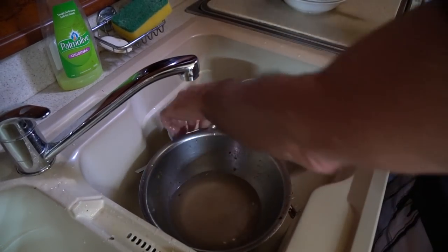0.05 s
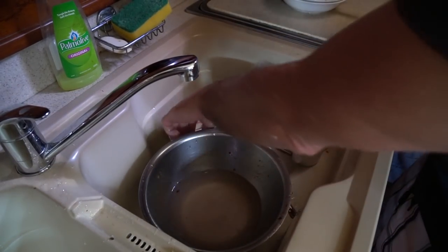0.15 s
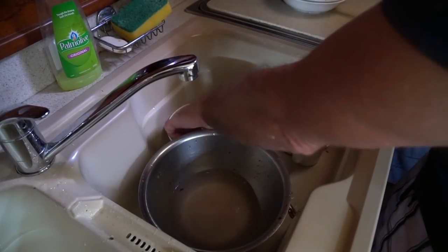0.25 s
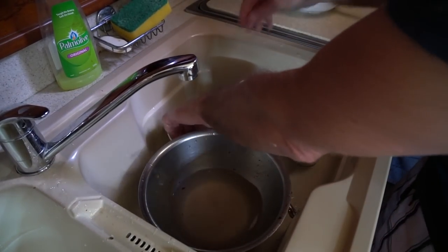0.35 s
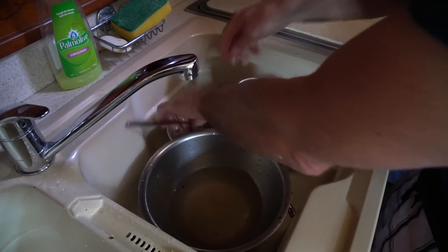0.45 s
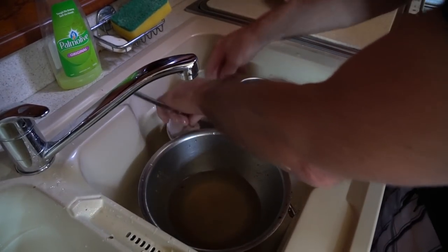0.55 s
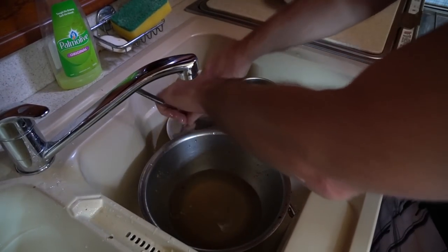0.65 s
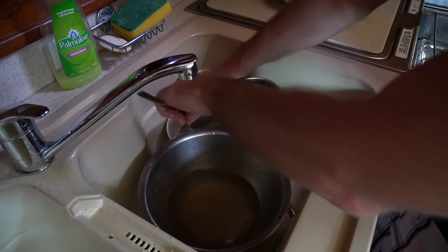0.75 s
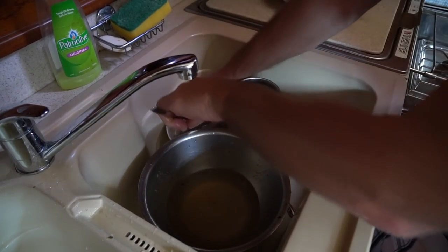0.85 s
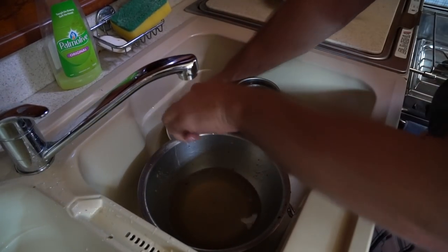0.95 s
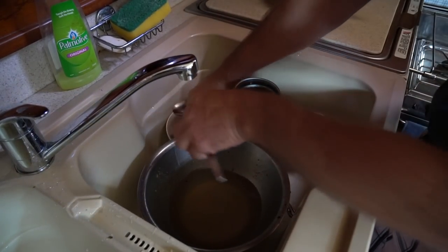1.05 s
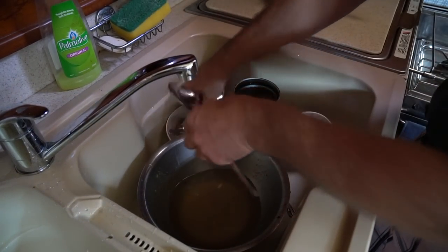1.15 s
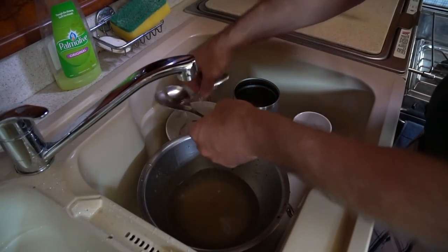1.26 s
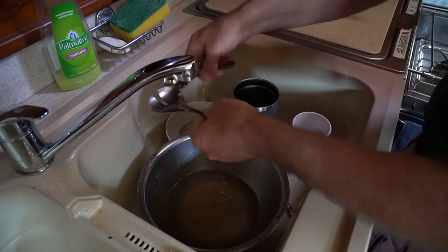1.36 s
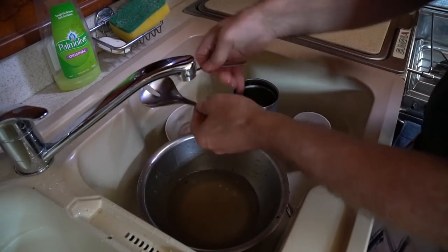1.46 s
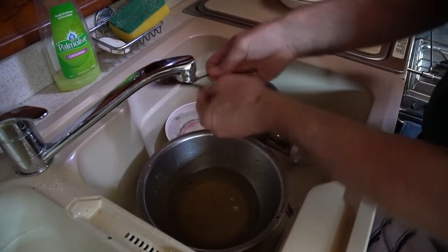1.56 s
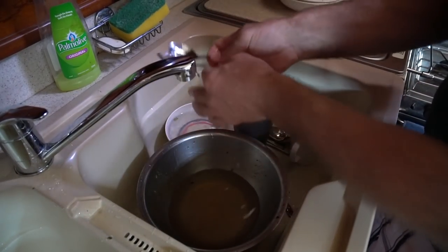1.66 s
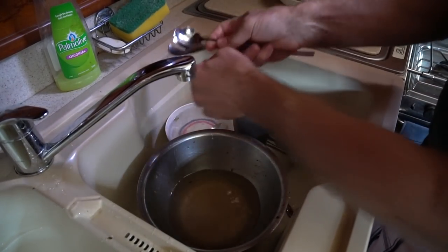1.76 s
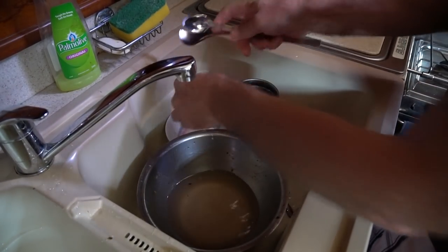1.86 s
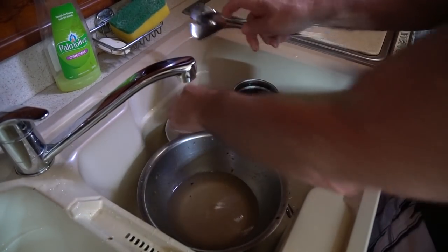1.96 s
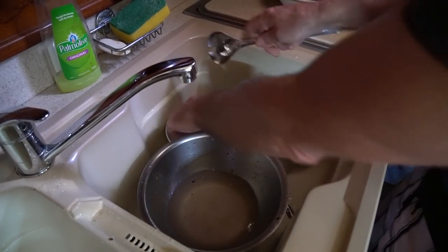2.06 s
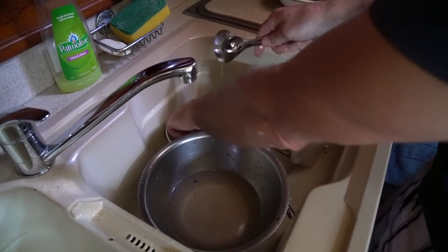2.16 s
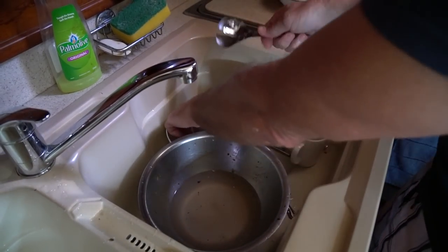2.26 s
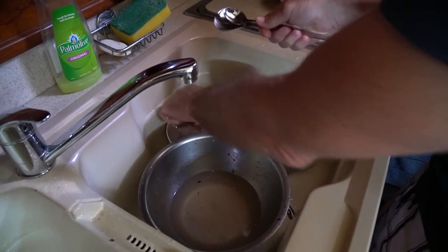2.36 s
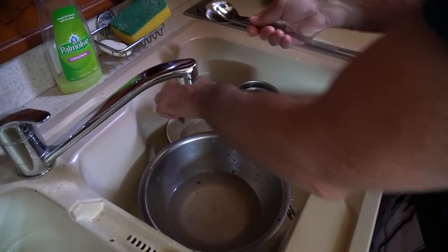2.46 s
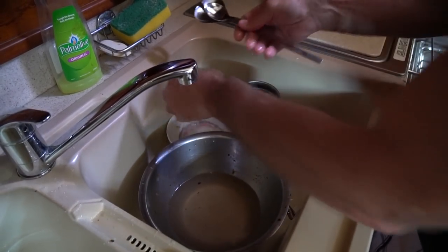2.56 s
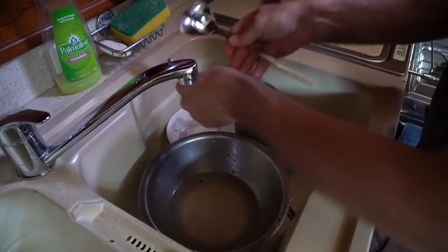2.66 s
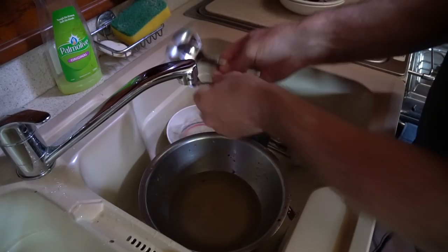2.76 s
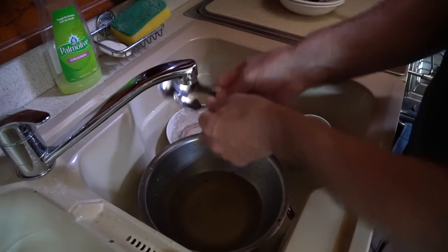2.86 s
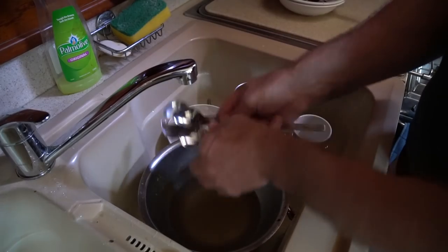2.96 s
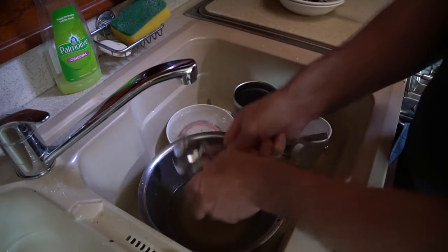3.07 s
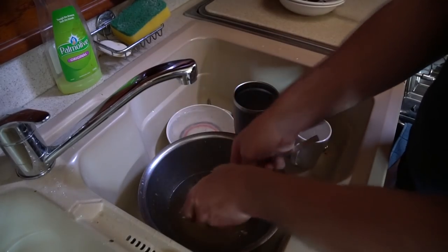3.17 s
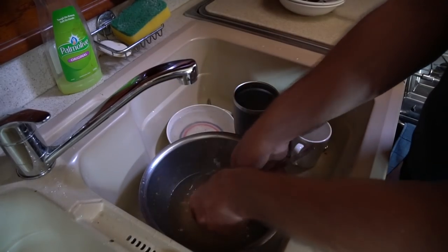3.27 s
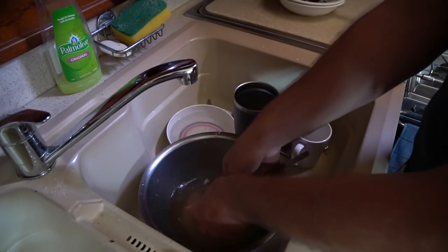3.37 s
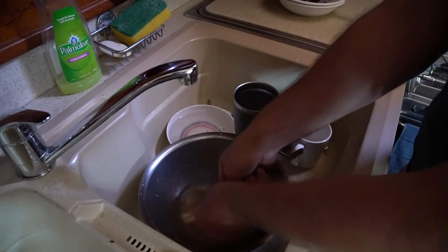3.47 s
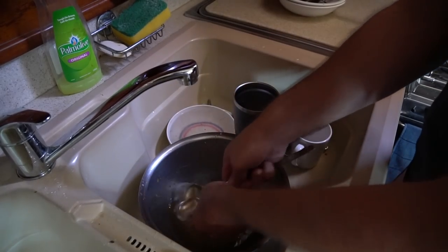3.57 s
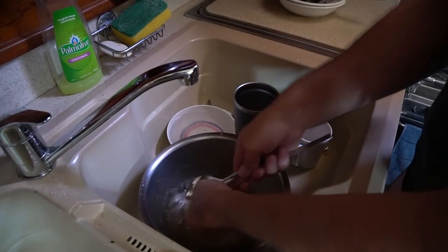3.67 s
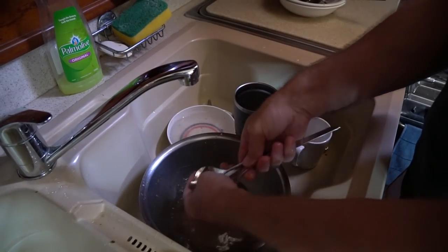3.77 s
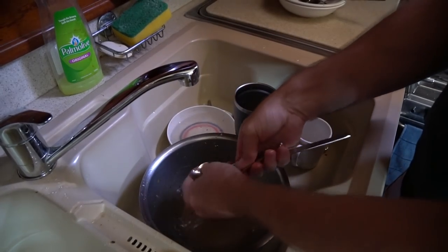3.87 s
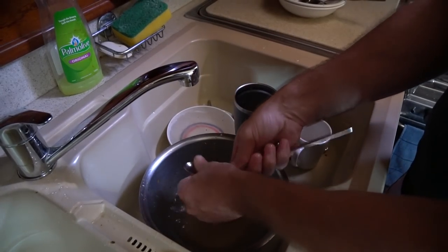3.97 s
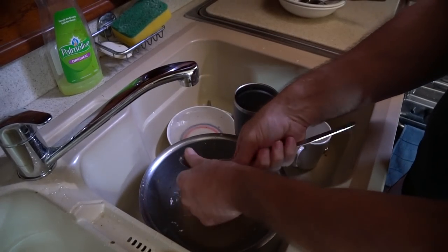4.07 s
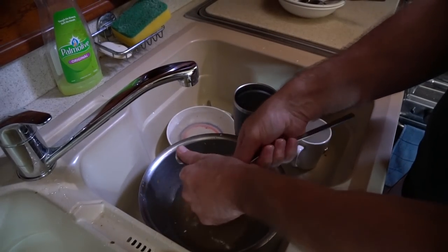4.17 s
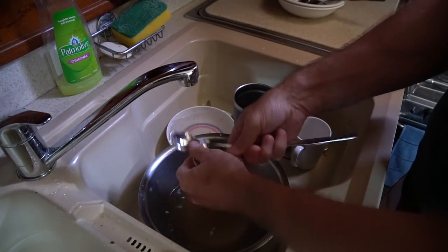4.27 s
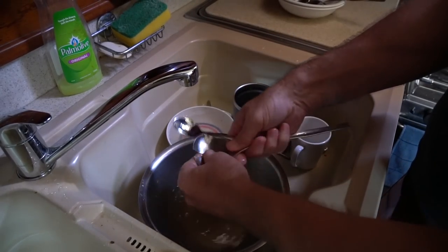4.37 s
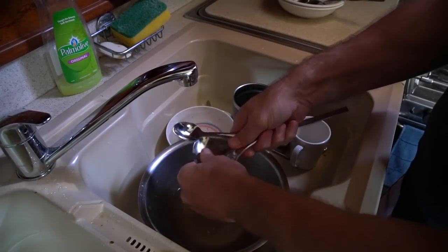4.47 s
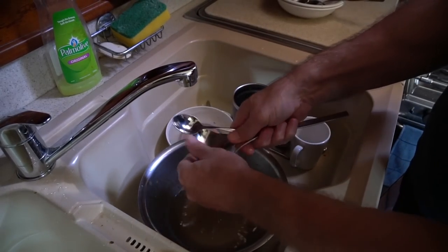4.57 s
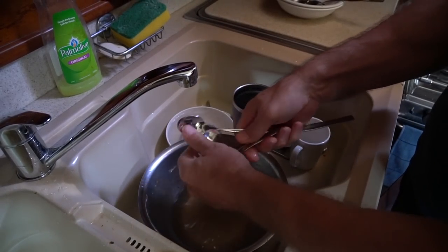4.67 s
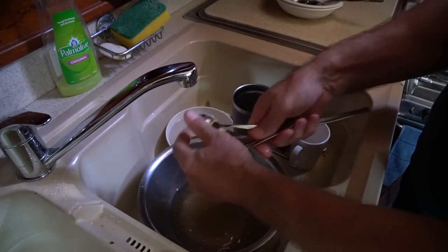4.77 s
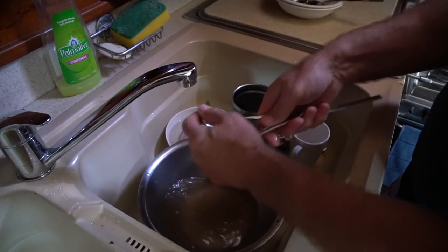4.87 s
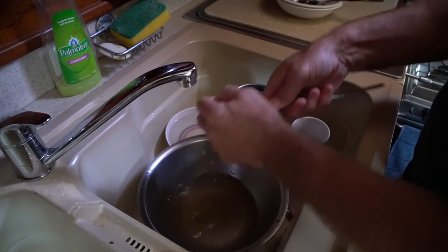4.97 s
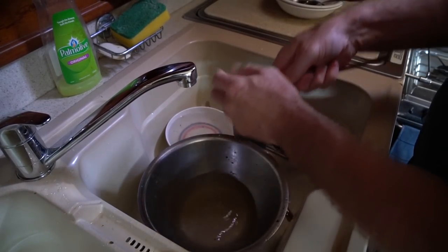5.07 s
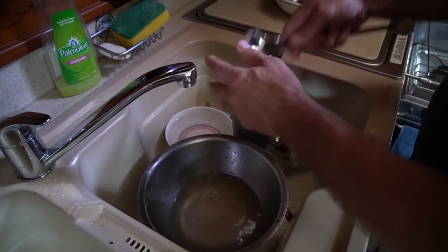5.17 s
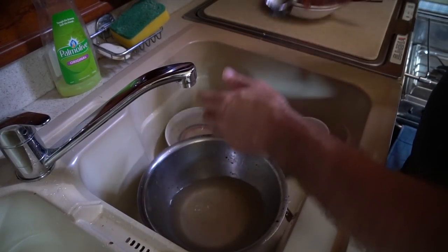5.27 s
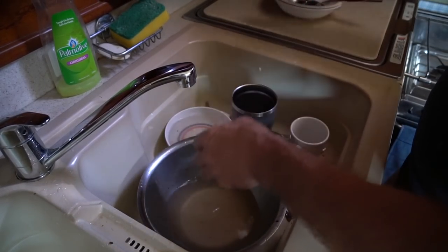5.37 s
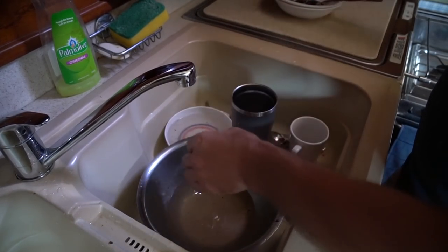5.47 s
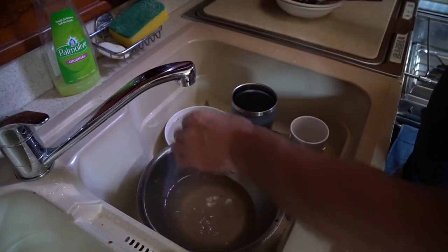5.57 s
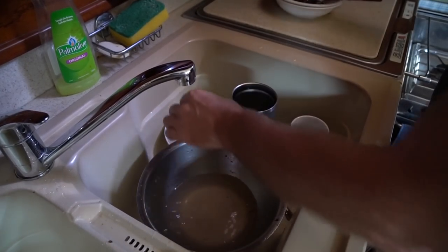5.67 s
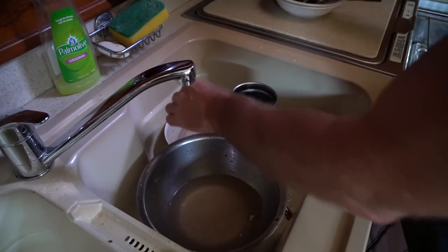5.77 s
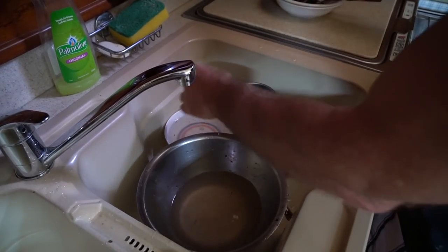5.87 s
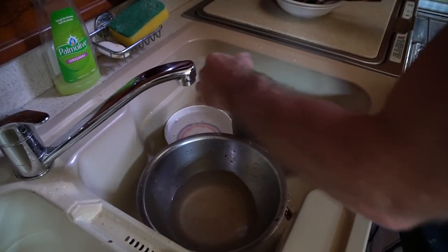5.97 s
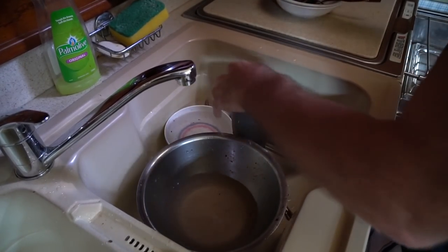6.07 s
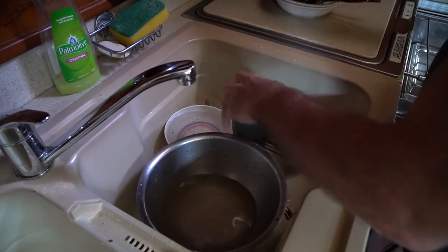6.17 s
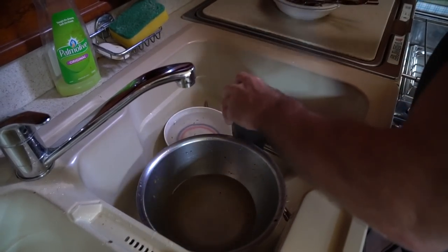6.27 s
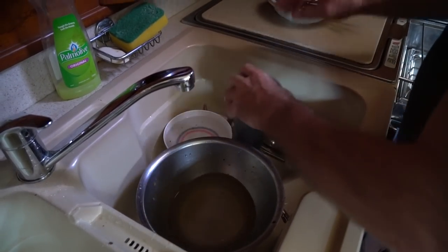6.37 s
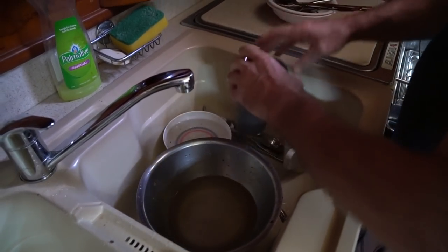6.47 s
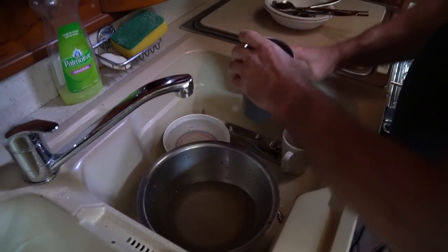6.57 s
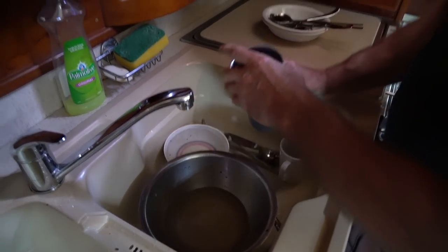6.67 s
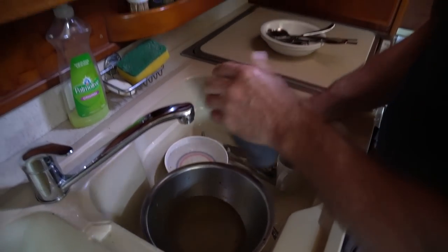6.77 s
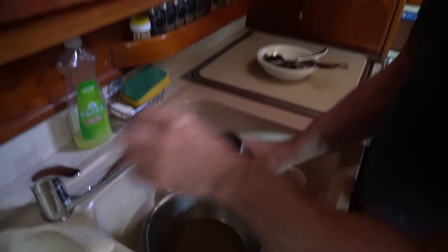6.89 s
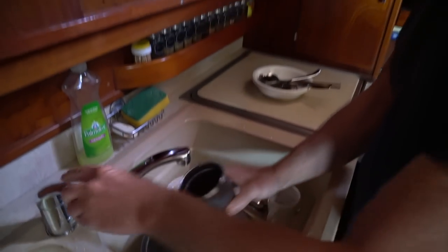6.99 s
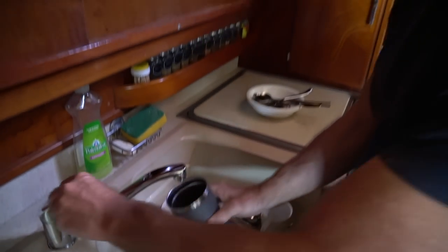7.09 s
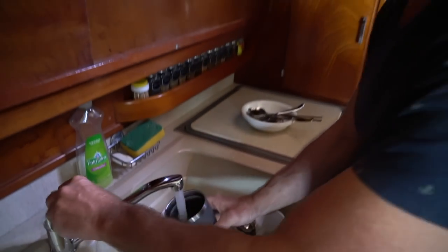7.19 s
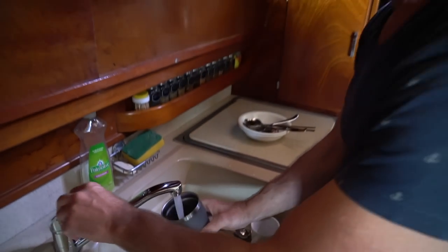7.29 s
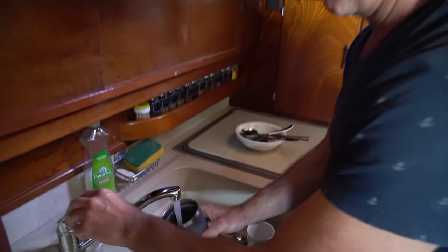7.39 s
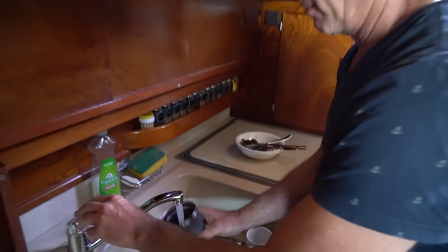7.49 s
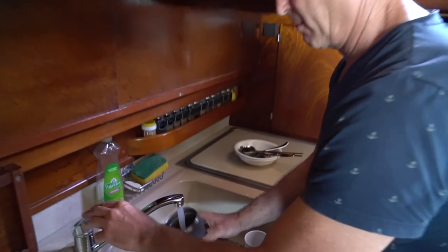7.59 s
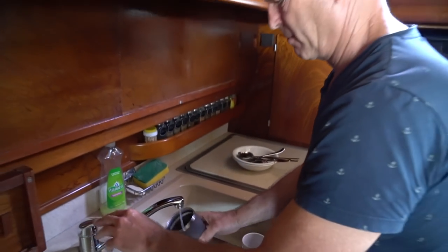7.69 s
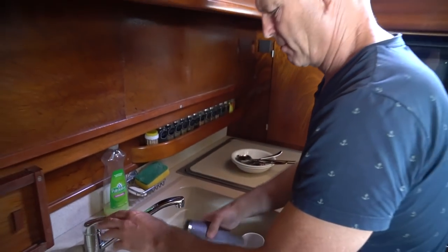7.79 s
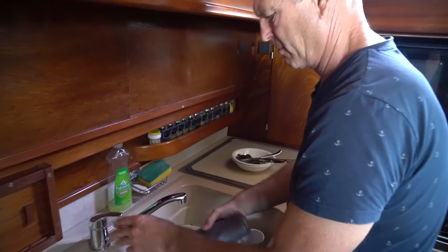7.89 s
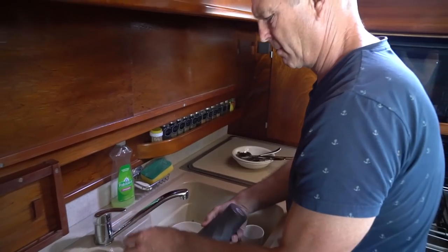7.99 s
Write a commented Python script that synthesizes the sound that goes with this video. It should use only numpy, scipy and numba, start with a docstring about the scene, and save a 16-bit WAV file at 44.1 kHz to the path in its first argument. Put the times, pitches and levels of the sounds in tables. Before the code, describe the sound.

Bowls and a steel pot clatter in a sink, cutlery chinks and splashes, a mug rings briefly, then a tap runs into it.

```python
"""Hand washing-up in a small wooden galley, heard from close by, over the cabin's faint rumble, hiss and wavering hum.
First bowls and a steel pot knock and grind in the sink; then a fistful of cutlery chinks, is dunked with a splash
and is dropped in a bowl. A mug rings until a hand closes round it, then the tap runs and its pump hums.
Every contact is a burst of tiny collisions that rings the things struck; water is shaped noise and clouds of
chirping bubbles. The cabin adds a short diffuse tail."""
import sys
import numpy as np
from scipy import signal
from scipy.fft import rfft, irfft
from scipy.io import wavfile
from scipy.ndimage import uniform_filter1d
from numba import njit

SR = 44100
rng = np.random.default_rng(int(sys.argv[2]) if len(sys.argv) > 2 else 0)


def invert_db(x):
    """Field ratio 10**(x/20) for x, a level in decibels (scalar or array-like)."""
    u = np.asarray(x, float) / 20
    return 10 ** u


def int16_out(signal):
    """Quantize to a 16-bit WAV file."""
    q = np.round(np.clip(np.atleast_2d(signal).T, -1, 1) * 32767)
    wavfile.write(sys.argv[1], SR, q.astype(np.int16))


N = 354194
TIME = np.arange(N) / SR
SIDES = np.array([[1], [-1]])  # left, right
CUTLERY_FROM_S, MUG_FROM_S = 1.5555, 6.2896  # first blow of each

# limits of the bass, middle and treble bands of a contact: (frequency [Hz])
CONTACT_EDGES_HZ = (270, 1600, 5500, 11500)


def unit(x):
    """Scale to rms 1."""
    return x / np.sqrt(np.mean(x ** 2))


def band(x, lo_hz, hi_hz, order=2):
    """Band-pass."""
    return signal.sosfilt(signal.butter(order, [lo_hz, hi_hz], "bandpass", fs=SR, output="sos"), x)


def coloured(points, shape):
    """Noise of rms 1 whose spectrum follows (Hz, dB) points."""
    hz, db = np.transpose(points)
    noise_hz = np.fft.rfftfreq(N, 1 / SR) + 1
    gain = invert_db(np.interp(np.log(noise_hz), np.log(hz), db))
    return unit(irfft(rfft(rng.standard_normal(shape)) * gain, N))


def walk(rate):
    """Random levels held 1 / rate s and slewed; spread near 1."""
    k = int(SR / rate)
    levels = np.repeat(rng.standard_normal(N // k + 1), k)
    return unit(uniform_filter1d(levels, k))[:N]


def swells(rows):
    """Sum of envelopes that rise, hold and die away, straight in dB; rise and t60 are times over 60 dB."""
    total = 0
    for full_s, hold, db, rise, t60 in rows:
        before = np.clip(full_s - TIME, 0, None)
        after = np.clip(TIME - full_s - hold, 0, None)
        total = total + invert_db(db - 60 * before / rise - 60 * after / t60)
    return total


def tones(rows, glide, rise_ms):
    """Damped tones whose pitch moves steadily from the given one, by a share of 2 * glide over the t60."""
    out = np.zeros(N)
    for start, db, hz, t60_ms in rows:
        i, t60 = int(start * SR), t60_ms / 1000
        t = TIME[:min(int(t60 * SR), N - i)]
        level = invert_db(db - 60 * t / t60) * (1 - np.exp(-1000 * t / rise_ms))
        out[i:i + len(t)] += level * np.sin(2 * np.pi * hz * t * (1 + glide * t / t60))
    return out


def bubbles(during, low_hz, span, cycles, count):
    """A cloud of small bubbles between two times, each ringing a few cycles and rising in pitch; rms 1 there."""
    start, end = during
    when, pitch, size = rng.random((count, 3)).T
    hz = low_hz * span ** pitch
    rows = np.transpose([start + when * (end - start), 12 * size, hz, 1000 * cycles / hz])
    return unit(tones(rows, glide=0.108, rise_ms=0.091)) * np.sqrt((end - start) * SR / N)


def colour(middle_db, slope, offset_db):
    """Gains of bass, middle and treble, treble at 0 dB: bass dB = slope * middle dB + offset dB."""
    return invert_db(np.array([slope * middle_db + offset_db, middle_db, 0 * middle_db]))


def grit(scatter_db):
    """Dense tiny collisions of uneven size, heard as bass, middle and treble."""
    sizes = np.minimum(rng.exponential(size=N // 16 + 1), 4.5)
    size = invert_db(scatter_db * np.repeat(sizes, 16)[:N])
    limits = zip(CONTACT_EDGES_HZ, CONTACT_EDGES_HZ[1:])
    return np.array([unit(band(size * rng.standard_normal(N), lo, hi, order=3)) for lo, hi in limits])


@njit
def ring(push, latest, gains, poles):
    """Each mode is pushed with the share and pitch that the latest blow gives it, and decays freely."""
    out = np.zeros(len(push))
    for m in range(poles.shape[1]):
        z = 0j
        for i in range(len(push)):
            z = z * poles[latest[i], m] + gains[latest[i], m] * push[i] + 1e-18
            out[i] += z.imag
    return out


def struck(blows, bass, modes, rub, ring_db, focus_db, rise_ms, kick_db, crack_db=5.5, scatter_db=3.5,
           pieces=False, chatter_db=-.5, slide_db=-27.5, dull_db=1.5, dull_t60=.012, damping=1):
    """Blows and rubbing shake an object: returns its raw chatter and its modes, loudest near the favoured ring."""
    # part of the t60 that bass, middle and treble chatter for: (share [1])
    fade_share = np.array((1.242, 0.961, 0.743))[:, None]
    slide_t60 = 0.363  # s; every blow leaves things sliding a while
    s, db, middle_db, favoured_hz, t60, *second_hz = np.transpose(blows)
    effort, impact = rub.copy(), np.zeros((3, N))
    for start, gains, fade in zip(s, (invert_db(db) * colour(middle_db, *bass)).T, t60):
        i = int(start * SR)
        t = TIME[:min(int(slide_t60 * SR), N - i)]
        decay = invert_db(-60 * t / fade / fade_share) + invert_db(slide_db - 60 * t / slide_t60)
        effort[:, i:i + len(t)] += gains[:, None] * decay * (1 - np.exp(-1000 * t / rise_ms)) / 2
        impact[:, i] = gains
    chatter = np.sum(effort * grit(2.15), axis=0)

    # the first contact is one sharp impulse: it cracks, and it kicks every mode at once
    limits = zip(impact, CONTACT_EDGES_HZ, CONTACT_EDGES_HZ[1:])
    kick = sum(band(one, lo, hi) for one, lo, hi in limits)

    # loose pieces differ a little in size: all modes shift until the nearest one sits on the favoured ring
    hz, mode_db, mode_t60 = np.transpose(modes)
    favoured = favoured_hz[:, None]
    nearest = hz[np.argmin(np.abs(np.log(hz / favoured)), axis=1)]
    hz = hz * (favoured_hz / nearest)[:, None] ** pieces
    octaves = np.abs(np.log2(hz / favoured))
    focus = focus_db * np.exp(-(octaves / 0.061) ** 2)
    shares = invert_db(ring_db + mode_db + focus + scatter_db * rng.standard_normal(octaves.shape))

    # the spot that is hit adds its own broad, quickly damped rings
    dull_hz = np.transpose([favoured_hz, *second_hz])
    hz = np.hstack([hz, dull_hz])
    shares = np.hstack([shares, invert_db(dull_db + 0 * dull_hz)])
    damping = np.reshape(damping, (-1, 1))
    all_t60 = np.append(mode_t60, dull_t60 + 0 * dull_hz[0]) * damping
    loss = np.log(1000) / (all_t60 * SR)
    latest = np.clip(np.searchsorted(s, TIME + 1 / SR) - 1, 0, None)
    # the loss in the gain keeps the peak height of a mode independent of its t60
    gains = 2 * loss * shares * damping ** .5
    rings = ring(chatter + invert_db(kick_db) * kick, latest, gains, np.exp(2j * np.pi * hz / SR - loss))
    return invert_db(chatter_db) * chatter + invert_db(crack_db) * kick, rings


def cabin():
    """Faint rumble and hiss, the bass alike on both sides, and a low narrow-band hum that wavers."""
    # spectrum of the rumble and hiss: (frequency [Hz], relative level [dB])
    rumble_and_hiss = [(15, -29), (40, -3.5), (64, -6), (138, -12.5), (240, -14.5), (401, -33), (740, -33),
                       (819, -35), (11000, -48.5), (14300, -84), (22000, -120)]
    # level of the hum: (time [s], level [dB])
    hum_levels = [(0.0, -61.5), (0.09, -62.5), (5.59, -59.5), (5.86, -48.5), (6.78, -68), (7.42, -62.5),
                  (7.6, -46), (8.03, -64.5)]
    mid, side = coloured(rumble_and_hiss, (2, N))
    side = band(side, 300, 11000, order=1)
    s, db = np.transpose(hum_levels)
    hum = unit(band(rng.standard_normal(N), 91, 103)) * invert_db(np.interp(TIME, s, db))
    return invert_db(-64 + 2.0 * walk(1)) * (mid + .8 * side * SIDES) + hum


def scrapes():
    """Rubbing of whatever is in hand: unsteady bass, middle and treble effort; duller rubbing has more bass."""
    # scrapes: (full by [s], hold [s], treble level [dB], middle re treble [dB])
    scrape_rows = [(0.151, 0.218, -50, 10.5), (0.469, 0.1487, -39.5, 3), (0.965, 0.483, -60, 6),
                   (1.6, 0.742, -67.5, 2.5), (2.75, 0.039, -67.5, 6), (3.19, 0.026, -51.5, -4.5),
                   (3.801, 0.055, -59, -9.5), (4.867, 0.054, -42.5, -11.5), (5.201, 0.47, -71.5, -3),
                   (5.398, .004, -42, -10), (5.55, .02, -51, -12), (5.6, 0.1523, -30.5, -5.5),
                   (5.9, 0.1416, -32, -16), (6.255, 0.028, -67.5, -0.5), (6.419, 0.286, -77, 5.5)]
    rise, t60 = .15, 0.23  # s over 60 dB
    rub = np.zeros((3, N))
    for full_s, hold, db, middle_db in scrape_rows:
        rub = rub + colour(middle_db, 0.87, -9)[:, None] * swells([(full_s, hold, db, rise, t60)])
    return rub * invert_db(2.5 * walk(40))


def thumps():
    """Dull thumps through the furniture: low damped tones that sag in pitch."""
    # thumps: (time [s], level [dB], starting pitch [Hz], t60 [ms])
    thump_rows = [(0.08, -40, 86.1, 320), (1.635, -38.5, 276, 90), (1.95, -41.5, 252, 161),
                  (2.118, -38.5, 56.6, 159), (3.352, -30, 70, 306), (4.83, -48.5, 276, 200),
                  (4.875, -48, 283.3, 200), (5.977, -25, 125, 130), (6.29, -38, 317.7, 197.5),
                  (6.299, -31.5, 96, 75), (7.026, -42.5, 65, 310), (7.04, -46.5, 149.5, 302),
                  (7.666, -17, 102.3, 51), (7.69, -27, 59.5, 146)]
    return tones(thump_rows, glide=-0.21, rise_ms=5.2)


def pot_and_bowls(rub):
    """Bowls and a steel pot knock and grind: returns the clatter and the ringing of the pot's modes."""
    # blows: (time [s], treble level [dB], middle re treble [dB], favoured ring [Hz], chatter t60 [s],
    # second dull ring, of china [Hz])
    dish_blows = [(0.1144, -33, 5, 608, 0.093, 4500), (0.1546, -22, 6.5, 755, 0.2, 3300),
                  (0.2367, -24, 6.5, 931, 0.22, 3750), (0.3074, -15.5, -8.5, 4455, 0.2, 620),
                  (0.411, -27, 1, 731, 0.25, 4500), (0.4567, -13, -5.5, 694, 0.24, 4700),
                  (0.5352, -13.5, -10, 4500, 0.43, 3200), (0.6165, -20, -8.5, 4700, 0.23, 700),
                  (0.6389, -21, -7, 4500, 0.157, 720), (0.7096, -35, 15, 690, 0.2, 2900),
                  (0.9657, -32.5, 9, 699, 0.12, 4300), (1.0261, -26, -3, 3721, 0.66, 4500),
                  (1.0933, -17, -0.5, 707, .22, 4500), (1.1414, -10.5, -13, 908, 0.073, 9000),
                  (1.1669, -23, 13, 904, 0.118, 1543), (1.2221, -11, -2.5, 716, 0.23, 5000),
                  (1.2774, -19.5, 11.5, 4237, 0.073, 800), (1.2968, -25.5, 10.5, 3650, 0.196, 1400)]
    # modes of the pot: (frequency [Hz], relative level [dB], t60 [s])
    pot_modes = [(250, -3, .06), (370, -1, .07), (625, 0, .06), (716, 3, .06), (904, 6, .12),
                 (1033, 7, .06), (1240, 4, .5), (1361, -2, .06), (1497, -1, .5), (1535, 2, .07),
                 (1975, 4, .55), (2056, 4, .25), (2293, 2, .25), (2430, 4, .45), (2616, 6, .6),
                 (2980, 3, .4), (3160, 2, .5), (3203, 3, .5), (3300, -2, .03), (3650, 0, .07),
                 (3930, 5, .5), (3984, 6, .4), (4037, 4, .2), (4400, -2, .025), (4640, 2, .3),
                 (4830, -3, .04), (5750, 0, .04), (7300, -2, .05), (9000, -2, .05), (10400, -2, .05)]
    return struck(dish_blows, (1, -9), pot_modes, rub * (TIME < CUTLERY_FROM_S), ring_db=7.0, focus_db=14.0,
                  rise_ms=1.5, kick_db=24.0, crack_db=-1.12, chatter_db=-1, slide_db=-31, dull_db=5, dull_t60=.014)


def galley(x, t60=0.06, wet_db=-6.5, wide_hz=1400, wide_db=4.5, count=3):
    """Direct sound plus a dense short tail, its treble unlike left and right; each spot in the sink has its own."""
    t, out = TIME[:int(t60 * SR)], x
    k = int(.2 * SR)  # the sound stays 0.2 s in one spot
    spot = np.repeat(rng.integers(0, count, N // k + 1), k)[:N]
    for here in range(count):
        mid, side = rng.standard_normal((2, len(t))) * invert_db(-60 * t / t60) * (1 - np.exp(-t / 0.002))
        side = signal.sosfilt(signal.butter(1, wide_hz, "highpass", fs=SR, output="sos"), side)
        tail = (mid + invert_db(wide_db) * side * SIDES) * invert_db(wet_db) / np.sqrt(np.sum(mid ** 2))
        from_here = x * uniform_filter1d(1. * (spot == here), k // 4)
        out = out + signal.oaconvolve(from_here[None], tail, axes=1)[:, :N]
    return out


def drips():
    """Drips, bubbles and lone small rings: short damped tones that rise in pitch."""
    # drips: (time [s], level [dB], starting pitch [Hz], t60 [ms])
    drip_rows = [(2.25, -36.5, 1387, 191), (1.437, -29, 738, 150), (2.179, -26, 760, 100),
                 (2.18, -27, 1480, 60), (2.386, -36, 2690, 31), (2.517, -28.5, 1460, 38.7),
                 (2.617, -35, 985.3, 136), (2.733, -38, 2681, 50), (3.489, -24.5, 3037, 39),
                 (3.553, -23, 1898, 62), (3.597, -22.5, 1402, 50.3), (3.615, -31, 1045, 111),
                 (3.621, -16, 2615, 27.5), (3.648, -35, 2600, 48.6), (3.698, -36, 1232, 38),
                 (3.825, -26, 2850, 110), (3.828, -25, 3300, 140), (3.83, -31, 4100, 90),
                 (7.336, -30, 950, 60), (7.392, -36, 1060, 120), (7.309, -33, 560, 240),
                 (7.326, -22.5, 1516, 41.3), (7.379, -33.5, 1060, 105), (7.425, -24, 4185, 28.8),
                 (7.49, -31.5, 1620, 57), (7.569, -24, 1556, 25.7), (7.69, -28.5, 1760, 40)]
    return tones(drip_rows, glide=0.129, rise_ms=0.4)


def cutlery(rub):
    """Loose steel pieces chink, chatter and modes together; later they lie in a bowl that adds body and damps them."""
    # blows: (time [s], treble level [dB], middle re treble [dB], favoured ring [Hz], chatter t60 [s])
    cutlery_blows = [(1.5555, -14, -15, 8066, 0.304), (1.588, -22, -17.5, 10260, 0.313),
                     (1.6911, -13.5, -29.5, 9092, 0.1664), (1.947, -37.5, 4.5, 2770, 0.295),
                     (2.052, -13.5, -15, 9945, 0.162), (2.143, -35.5, -7, 2777, 0.103),
                     (2.1788, -42.5, 17.5, 2370, 0.165), (2.2209, -18, -25.5, 8200, 0.153),
                     (2.237, -23, -12.5, 10240, 0.1), (2.374, -55.5, 15, 2110, 0.157),
                     (2.417, -38, -14, 7800, 0.152), (2.4517, -20, -15.5, 9200, 0.153),
                     (2.492, -27.5, -7.5, 8580, 0.14), (2.583, -35.5, -8.5, 7780, 0.115),
                     (2.6633, -46.5, -9, 9800, 0.3), (2.8007, -17.5, -22.5, 9004, 0.317),
                     (2.848, -16, -29, 5040, 0.071), (2.8768, -11.5, -18.5, 5290, 0.1925),
                     (2.9024, -20, -16, 6450, 0.135), (2.9951, -11, -19.5, 10920, 0.0985),
                     (3.211, -26.5, -9.5, 7290, 0.046), (3.495, -38, -3, 7500, .05),
                     (3.541, -34, -6, 6000, .06), (3.5516, -19, -9, 8888, 0.141),
                     (3.648, -38, -4, 5000, .1), (3.716, -42, -20, 9500, .1),
                     (3.7918, -21.5, -10, 6201, 0.091), (3.8234, -38, 1, 3200, .25),
                     (3.8736, -10.5, -16.5, 6770, 0.248), (3.987, -21, -5.5, 3240, 0.114),
                     (4.047, -29.5, -6, 3434, 0.09), (4.0756, -33, -8.5, 2370, 0.162),
                     (4.2131, -20.5, -10.5, 6332, 0.095), (4.2347, -14.5, -18.5, 10530, 0.1676),
                     (4.3064, -16.5, -15, 9940, 0.258), (4.3455, -14, -10.5, 4280, 0.0765),
                     (4.3776, -11.5, -15.5, 9180, 0.163), (4.4531, -19.5, -15, 6994, 0.087),
                     (4.511, -33, -9, 8200, 0.125), (4.598, -21, -19, 10900, 0.242),
                     (4.6828, -12.5, -16, 9900, 0.0733), (4.7229, -11, -17.5, 11300, 0.144),
                     (4.918, -10.5, -20, 9536, 0.284), (4.9531, -12.5, -20, 8843, 0.152),
                     (4.9925, -17.5, -15.5, 5200, 0.169), (5.0938, -16, -16.5, 5345, 0.1016),
                     (5.1628, -33, -20, 4635, 0.176), (5.4026, -15.5, -18.5, 10370, 0.38),
                     (5.4655, -25, -15, 6600, 0.22), (5.5118, -13.5, -23, 10420, 0.334),
                     (5.5674, -11, -12.5, 4028, 0.347), (5.6178, -18, -19.5, 6560, 0.357),
                     (5.705, -13, -15, 9500, 0.301), (5.7555, -13.5, -10.5, 9920, 0.247),
                     (5.8182, -24.5, -10.5, 5379, 0.1), (5.8755, -11, -10.5, 4720, 0.349),
                     (5.9704, -10, -10, 9476, 0.162), (6.0013, -12, -12.5, 5500, 0.229),
                     (6.0294, -12.5, -11, 7595, 0.221), (6.0635, -23.5, -5, 6100, .2),
                     (6.7487, -56, -4, 4493, 0.273)]
    # modes of a piece before it shifts in pitch, out of the bowl: (frequency [Hz], relative level [dB], t60 [s])
    cutlery_modes = [(1476, -12, 0.028), (1963, -21.5, 0.23), (2370, -8.5, 0.18), (2777, 1.5, 0.1),
                     (2940, 2, 0.12), (3240, 2, 0.19), (3650, 7, 0.089), (4280, 6, 0.035),
                     (4720, 2.5, 0.013), (5120, -2, 0.023), (5200, -3, 0.015), (5500, 0.5, 0.025),
                     (6100, -2, 0.025), (6505, -3, 0.021), (7290, -5, 0.065), (7100, -6.5, 0.024),
                     (7800, 3.5, 0.076), (8005, -4.5, 0.041), (8580, -10, 0.091), (9200, 2, 0.095),
                     (9682, -9, 0.061), (9755, -4.5, 0.032), (10516, 2, 0.051), (10530, 4, 0.17),
                     (10900, -2.5, 0.05), (10910, -5, 0.086)]
    in_bowl = np.array(cutlery_blows)[:, 0] > 5.55  # s
    bass = 1.949, -18 + 18.5 * in_bowl  # slope, offset [dB]
    in_hand = (TIME >= CUTLERY_FROM_S) * (TIME < MUG_FROM_S)
    return sum(struck(cutlery_blows, bass, cutlery_modes, rub * in_hand, ring_db=2.5, focus_db=7.5, rise_ms=0.8,
                      kick_db=23, scatter_db=4.5, pieces=True, damping=.45 ** in_bowl))


def lapping():
    """Water stirred in the pot is unsteady mid-band noise; water draining from spoons is small bubbles."""
    # stirred water: (full by [s], hold [s], level [dB], rise [s], t60 [s])
    stirs = [(2, 1.2, -64, .3, 1.5), (5.5, 1.9, -68, 0.26, 1.5), (2.19, 0.0163, -50, 0.035, 0.253),
             (2.38, 0.0125, -54, 0.036, 0.14)]
    # draining spoons: (full by [s], hold [s], level [dB], rise [s], t60 [s])
    trickles = [(2.24, 0.175, -51.5, 0.234, .3), (2.53, 0.164, -59, 0.11, .3),
                (3.5, 0.177, -44.5, 0.183, .4)]
    stirred = swells(stirs) * band(grit(0.66)[0], 400, 1000) * invert_db(3.9 * walk(15))
    return stirred + swells(trickles) * bubbles((2.15, 3.95), 1004, 3.54, 30, count=420)


def plops():
    """Plops: damped tones whose pitch sweeps up fast."""
    # plops: (time [s], level [dB], starting pitch [Hz], t60 [ms])
    plop_rows = [(2.371, -28, 1200, 55), (2.515, -38, 700, 60)]
    return tones(plop_rows, glide=2.6, rise_ms=1.5)


def splash():
    """Hands and cutlery plunge into the pot: spray, slosh, bubbles and a singing pot wall; then water runs off."""
    # treble spray, plunge then run-off: (full by [s], hold [s], level [dB], rise [s], t60 [s])
    spray_flow = [(3.237, 0.0318, -18.5, 0.013, 0.334), (3.63, 0.029, -56, .5, .5)]
    # middle wash: (full by [s], hold [s], level [dB], rise [s], t60 [s])
    wash_flow = [(3.27, 0.005, -21.5, .2, 0.576), (3.62, 0.116, -45.5, 0.36, 0.26)]
    # bass slosh: (full by [s], hold [s], level [dB], rise [s], t60 [s])
    slosh_flow = [(3.27, 0.1112, -27, 0.197, 0.279), (3.65, .02, -65.5, .6, .5)]
    # pot wall excited by the splash: (full by [s], hold [s], level [dB], rise [s], t60 [s])
    pot_sings = [(3.27, .12, -32, .1, .7)]
    during, plunge_s = (3.19, 3.8), 3.233
    slosh, wash, spray = grit(0.66)
    slosh = 0.654 * slosh + 1.03 * bubbles(during, 256.2, 4.59, 34, count=250)
    wash = 1.26 * wash + 0.63 * bubbles(during, 2416, 1.6, 45, count=150)
    wash = wash * invert_db(2.5 * walk(25))
    spray = spray * invert_db(2.5 * walk(35))
    wall = unit(band(rng.standard_normal(N), 2720, 3200))
    water = swells(spray_flow) * spray + swells(slosh_flow) * slosh + swells(wash_flow) * wash
    return (TIME > plunge_s) * (water + swells(pot_sings) * wall)


def mug(rub):
    """A mug is knocked and rings until a hand closes round it: returns the knocks and the ringing."""
    # blows: (time [s], treble level [dB], middle re treble [dB], favoured ring [Hz], chatter t60 [s])
    mug_blows = [(6.2896, -37, 2.5, 3620, 0.218), (6.3146, -24.5, 0.5, 2620, 0.176),
                 (6.3328, -23.5, 0, 4700, 0.098), (6.341, -24, 0, 2680, 0.1413)]
    # modes of the mug before the grip: (frequency [Hz], relative level [dB], t60 [s])
    mug_modes = [(700, 4, .24), (1163, 16, .7), (1346, 0, .5), (1432, 6, .4), (2202, 1, .6), (2659, 1, .1),
                 (3171, 0, .17), (3620, 4, .12), (4183, -8, .25), (4600, -4, .05)]
    knock, chime = struck(mug_blows, (1.32, -8.5), mug_modes, rub * (TIME >= MUG_FROM_S), ring_db=11.5,
                          focus_db=-0.74, rise_ms=9.7, kick_db=33, crack_db=-11.0, scatter_db=2.47)
    grip = invert_db(-250 * np.clip(TIME - 6.655, 0, 1))  # gripped at 6.655 s, the ring falls 250 dB/s faster
    return knock, grip * chime


def tap():
    """An aerated jet hisses; small bubbles gurgle in the mug under it."""
    # spectrum of the jet: (frequency [Hz], relative level [dB])
    jet_spectrum = [(710, -44.5), (1200, -6), (1660, -5), (1860, -6), (2450, -5.5), (2920, -2), (11000, -4),
                    (14300, -40), (22000, -120)]
    # the tap spits, opens, runs full, dribbles: (full by [s], hold [s], level [dB], rise [s], t60 [s])
    jet_flow = [(7.106, .03, -55, .004, .1), (7.137, 0.6016, -41, 0.03, 0.151),
                (7.3, 0.389, -42.5, 0.4625, 0.267), (7.79, 0.102, -55.5, 0.53, 0.66)]
    # gurgles in the mug: (full by [s], hold [s], level [dB], rise [s], t60 [s])
    gurgles = [(7.072, 0.15, -58, .02, 0.4), (7.325, 0.0137, -38.5, 0.072, 0.232),
               (7.5, 0.0223, -47, 0.55, 0.375), (7.7, 0.0062, -34.5, 0.43, 0.196),
               (7.79, 0.041, -57, 0.43, 0.63)]
    jet = coloured(jet_spectrum, N) * invert_db(1.29 * walk(60) + 0.98 * walk(400))
    return swells(jet_flow) * jet + swells(gurgles) * bubbles((7.06, 8.03), 502.6, 4.446, 21.6, count=900)


def pump():
    """A motor hum while the water flows: one sine whose pitch and level drift."""
    # hum of the pump: (time [s], pitch [Hz], level [dB])
    pump_hum = [(7.36, 120.7, -87), (7.42, 115.5, -52.5), (7.64, 120.7, -61), (7.7, 112, -72)]
    s, hz, db = np.transpose(pump_hum)
    phase = 2 * np.pi * np.cumsum(np.interp(TIME, s, hz)) / SR
    return invert_db(np.interp(TIME, s, db, -120, -120)) * np.sin(phase)


def scene():
    """Sink sounds through the cabin, a little to the left; thumps and hums stay central."""
    lean = invert_db(1.6 * SIDES / 2)  # left 1.6 dB above right
    rub = scrapes()
    clatter, pot_rings = pot_and_bowls(rub)
    knock, mug_rings = mug(rub)
    contacts = clatter + cutlery(rub) + knock
    water = drips() + lapping() + plops() + splash() + tap()
    sink = galley(contacts + water) + galley(pot_rings + mug_rings, wet_db=-8.0, wide_db=3.5)
    sink_loss = invert_db(-5.5)  # on the way from the sink to the microphone
    return lean * sink_loss * sink + thumps() + pump() + cabin()


def top_cut(x):
    """Nothing passes above the cut-off."""
    return signal.sosfilt(signal.butter(12, 12410, fs=SR, output="sos"), x)


def record(dry):
    """The recorder cuts the top steeply above 11150 Hz."""
    steep_cut = signal.ellip(10, .3, 62, 11150, fs=SR, output="sos")
    mix = signal.sosfilt(steep_cut, dry)
    return top_cut(mix)


dry = scene()
out = record(dry)
int16_out(out)
```